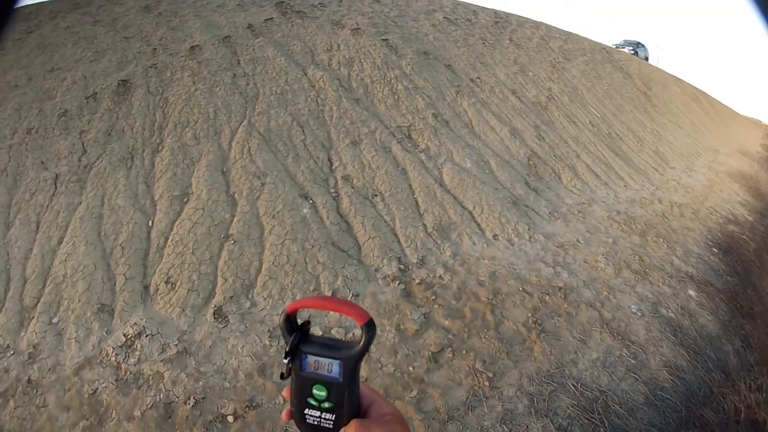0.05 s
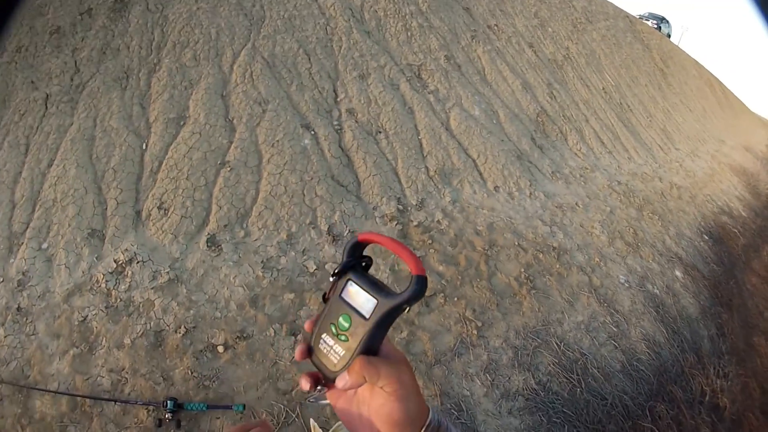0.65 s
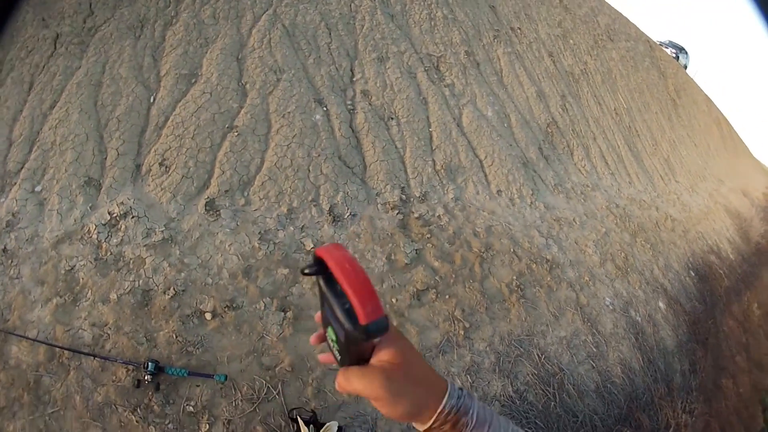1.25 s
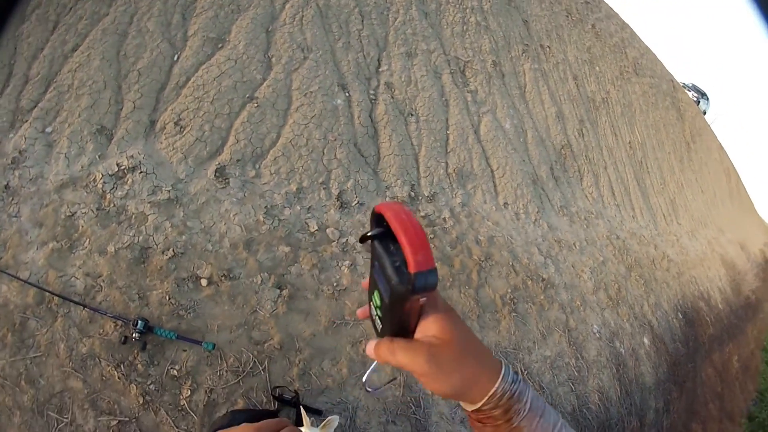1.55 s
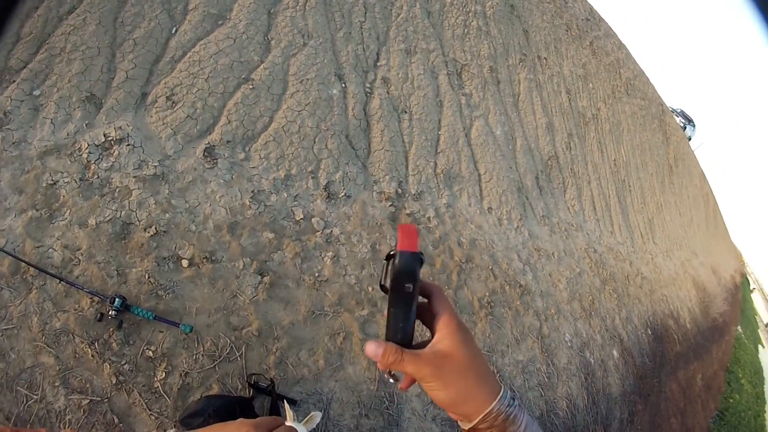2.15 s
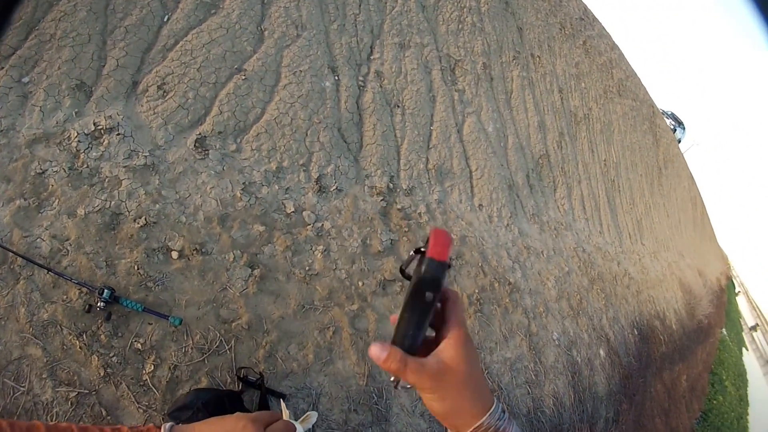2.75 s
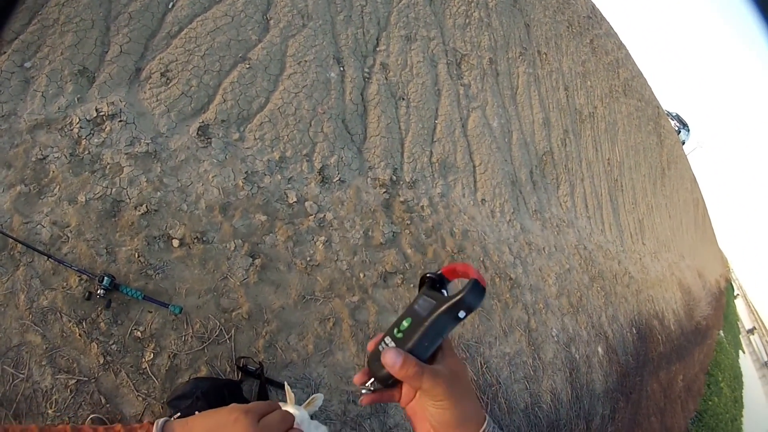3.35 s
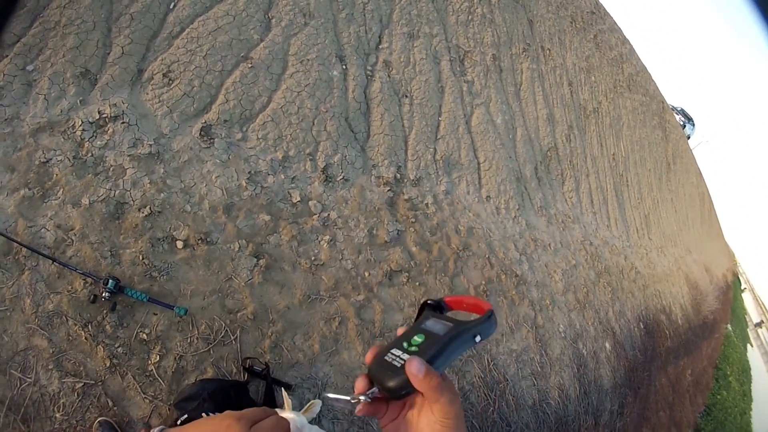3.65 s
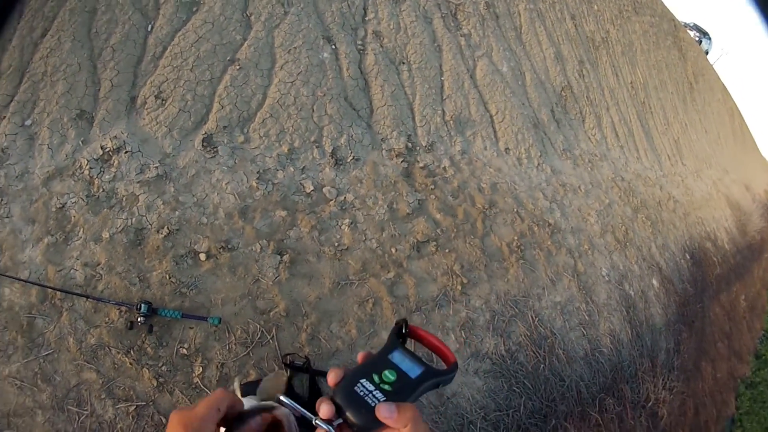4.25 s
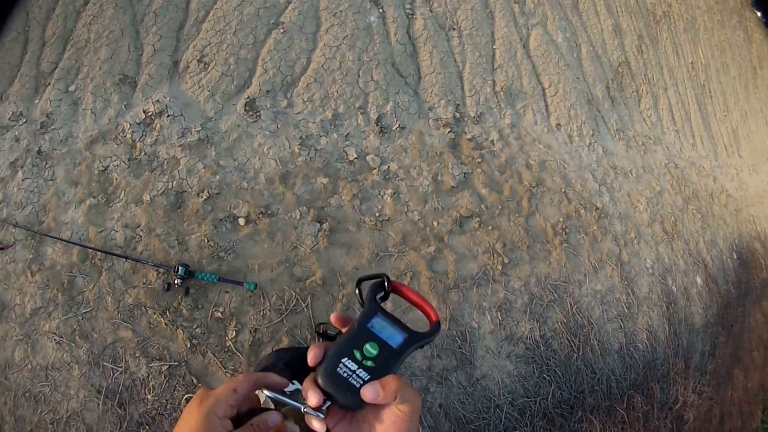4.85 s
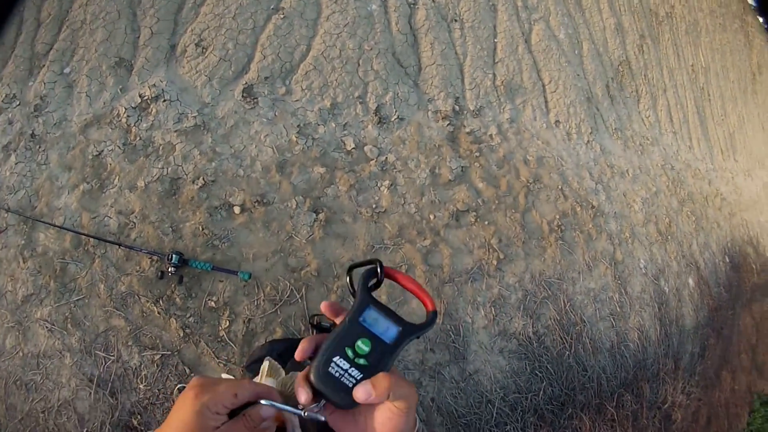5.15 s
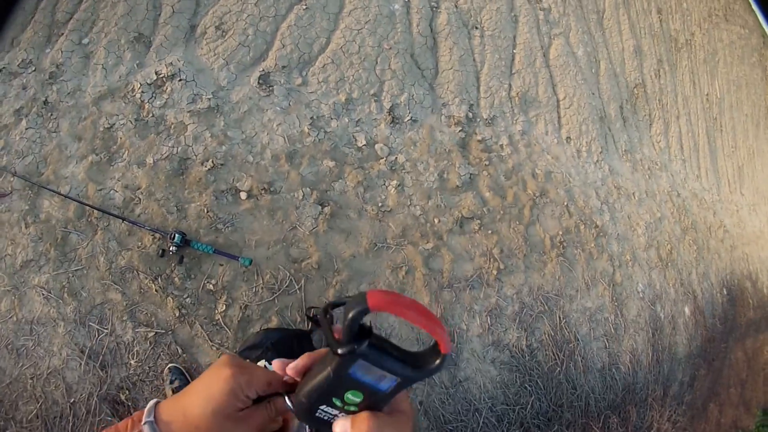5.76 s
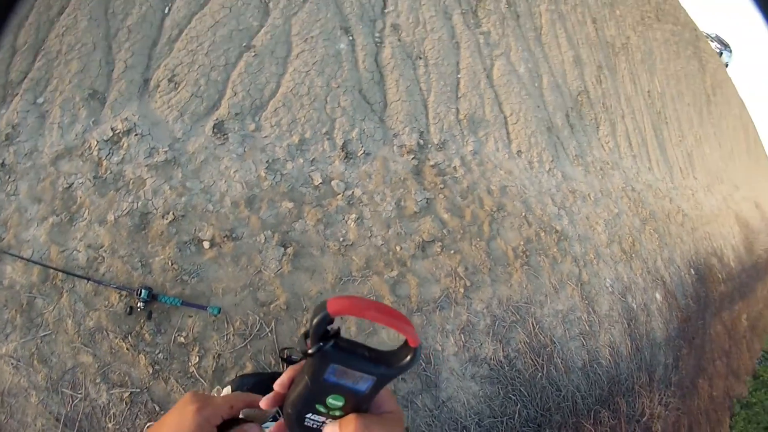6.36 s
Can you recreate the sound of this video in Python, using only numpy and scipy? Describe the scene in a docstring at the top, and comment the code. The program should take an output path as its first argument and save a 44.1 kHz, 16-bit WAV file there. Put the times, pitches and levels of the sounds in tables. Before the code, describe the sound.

A light outdoor breeze buffets a body-worn microphone with low, irregular puffs and rumble, strongest in the first second and slowly easing. At about 1.2 seconds a hanging scale is turned over in the hand: its steel clip and hook knock against the hollow plastic case in a quick flurry of small, bright clacks until 1.6, each ringing very briefly. Sparse ticks and a faint rasp of sliding steel follow. A second flurry comes from 2.8 to 3.2 seconds, then two soft fingertip taps on the case around 3.4. From 3.5 to 5 seconds the handling pauses while weaker wind puffs continue. Lighter, scattered clicks and tiny scrapes return from 5.1 to 6.1 seconds, with another dull tap near 5.9. The handling is close and quieter than the wind, both slightly to the left. A faint open-air rush and steady hiss lie underneath throughout.

```python
"""Low puffs of a light breeze buffet a body-worn microphone. After a second, small clacks join in:
a hanging scale is turned over in the hand, and its steel clip and hook swing against the hollow
plastic case. Each knock makes case, hook and clip ring briefly; in between, the steel slides and
fingers tap. Faint open-air noise and a steady hiss lie underneath."""
import sys
import numpy as np
from scipy import signal
from scipy.fft import rfft, irfft
from scipy.io import wavfile
from scipy.ndimage import uniform_filter1d

SR = 44100
rng = np.random.default_rng(int(sys.argv[2]) if len(sys.argv) > 2 else 0)


def dump_mix(stems):
    """Bounce the given channels to the path in sys.argv[1] as a 16-bit WAV at rate SR."""
    frames = np.atleast_2d(stems).T  # one column per channel
    limited = np.clip(frames, -1, 1)  # hard clip at full scale
    pcm = np.round(limited * 32767).astype(np.int16)
    wavfile.write(sys.argv[1], SR, pcm)


N = 282240

# the tones that case, hook and clip ring with: (pitch [Hz], level [dB], time to fade 60 dB if free [s])
SCALE_TONES = [(1060, -4.5, 0.034), (1266, -2, 0.055), (1367, -1.5, 0.045), (1470, 5.5, 0.017),
               (1617, 2.5, 0.021), (1840, -8, 0.049), (1957, -5.5, 0.045), (2180, -3.5, 0.029),
               (2292, -5.5, 0.042), (2420, -16.5, 0.031), (3194, -11, 0.02), (3520, -2, 0.017),
               (4075, -7, 0.023), (4710, -1, 0.015), (5140, -7, 0.024), (5500, -1, 0.014),
               (6100, -3, 0.0061), (6630, 0, 0.012), (6950, -5, 0.026), (6715, 6, 0.012),
               (7140, 0.5, 0.0061), (8160, -11, 0.0068), (11220, -12.5, 0.01)]
GRIP_SHARE = 0.72   # share of that fading time left when a hand holds the scale
# swirls of air that hit the microphone: (time [s], strength [dB], pitch [Hz], half length of gust [s])
SWIRLS = [(0.089, -36, 61, 0.021), (.142, -30, 60.5, 0.021), (.175, -36, 30, 0.017), (0.215, -38, 58, .015),
          (.245, -32.5, 35, 0.023), (0.291, -27, 48, 0.029), (.356, -38.5, 62, 0.014),
          (.759, -35, 41.2, 0.037), (.867, -34, 63, 0.017), (.886, -33.5, 52.7, 0.03),
          (0.946, -33, 46.6, 0.016), (0.971, -33, 48, 0.033), (1.088, -36, 65, 0.015),
          (1.118, -36.5, 67.6, .01), (1.183, -45, 33, 0.013), (1.346, -49.5, 35, 0.013),
          (1.42, -38, 30.2, 0.035), (1.474, -38.5, 28, 0.042), (1.686, -38, 34.5, 0.021),
          (1.975, -32.5, 27.3, 0.026), (2.116, -54, 35, .02), (2.365, -40, 41.6, .015),
          (2.44, -41.5, 38.3, 0.024), (2.623, -38, 29.2, 0.0082), (2.757, -34, 36.2, 0.022),
          (2.835, -45, 33, .025), (3.021, -35.5, 36.2, 0.051), (3.068, -42, 35.2, .013),
          (3.273, -38.5, 45.3, 0.0065), (3.417, -43.5, 26, 0.025), (3.496, -37, 42, 0.036),
          (3.78, -40.5, 28, .03), (4.038, -41.5, 54, 0.0076), (4.43, -41.5, 24.7, 0.0083),
          (4.931, -37.5, 43, 0.023), (4.981, -36.5, 31.5, 0.031), (5.052, -39.5, 34.7, 0.031),
          (5.431, -41.5, 38, 0.024), (5.525, -41, 32.7, 0.024), (5.65, -41, 28.8, 0.017)]


def clacks(scatter_db=2.0, detune=0.0082, hard_scuff_s=0.00055):
    """Steel knocks on the case and every part rings; the hardest, shortest knocks also crack."""
    # where a knock lands decides how hard each part rings:
    # (time [s], low case [dB], middle case [dB], high case [dB], hook [dB], clip [dB], scuff time [s])
    knocks = [(1.0222, -77, -83.0, -63, -73, -85.0, 0.0013),
              (1.2107, -50.5, -58, -48.5, -57.0, -59, 0.00082),
              (1.26, -55, -64, -58, -64.5, -65.5, 0.00068), (1.2695, -62, -70, -70, -64, -69, 0.0015),
              (1.279, -61, -70, -62, -64, -70, 0.0013), (1.2898, -50, -54, -60, -55, -56, 0.00068),
              (1.3069, -48.5, -58, -51.5, -52, -56.5, 0.0013),
              (1.3545, -57.5, -74, -65, -70, -61.5, 0.0015),
              (1.4455, -61.5, -70, -75.5, -73.0, -72.5, 0.0014), (1.458, -65, -72, -64, -70.5, -64, 0.0015),
              (1.522, -61, -69, -70.0, -74, -76, 0.0013), (1.5362, -64, -77, -80, -71, -71.0, 0.0013),
              (1.551, -66, -62.5, -66, -74, -63, 0.0041), (1.886, -69, -74, -66, -81.5, -68.0, 0.0014),
              (2.084, -73, -79, -67.5, -81, -74, 0.0014), (2.377, -63, -70, -61, -78.0, -75.0, 0.0019),
              (2.524, -77, -65, -63.5, -84, -85.0, 0.0013), (2.613, -66, -69, -72, -81.0, -76.0, 0.0026),
              (2.699, -68, -68, -68, -81.0, -80.0, 0.0018), (2.822, -60.5, -66, -65, -79.0, -66.0, 0.00082),
              (2.881, -50, -49, -60, -72, -69, 0.00071), (2.8929, -65, -52, -50.5, -67, -52.5, 0.00091),
              (2.943, -60, -65, -64, -81.0, -81.5, 0.002), (2.9982, -61, -61.5, -66, -72, -71, 0.0017),
              (3.0335, -53, -50.5, -54, -71, -76, 0.00098), (3.0383, -58, -61, -58, -63, -55, 0.00081),
              (3.0697, -55.5, -50.5, -68, -65, -58, 0.0007), (3.0832, -60, -57, -74, -80.0, -73, 0.0011),
              (3.222, -60.5, -65, -62, -76, -71.5, 0.0011), (3.232, -62, -57.5, -61, -75, -70.0, 0.0009),
              (5.132, -80.5, -80, -61, -73, -71, 0.00073), (5.209, -61, -62, -73, -75.5, -72, 0.0017),
              (5.243, -70, -73, -61.5, -81.5, -78.0, 0.0015), (5.354, -80, -79, -69, -69, -76, 0.0012),
              (5.515, -77, -82.5, -69.5, -81.0, -84.5, 0.0013), (5.532, -71, -70, -80, -82, -84, 0.0015),
              (5.565, -70, -66, -68, -81.0, -74, 0.0012), (5.782, -67, -70, -76, -84, -84, 0.0013),
              (5.8185, -60.5, -63.5, -67, -83, -79, 0.001), (5.857, -76.0, -66, -67, -81.5, -85.0, 0.00089),
              (6.111, -76, -76, -68, -81.0, -78.0, 0.0012), (6.124, -80, -81, -73, -84, -82, 0.0013)]
    t, out = np.arange(SR // 8) / SR, np.zeros(N + SR)
    hz, tone_db, fade_s = np.transpose(SCALE_TONES)
    for time_s, *parts_db, scuff_s in knocks:
        level_luck, pitch_luck, sign_luck = rng.standard_normal((3, len(hz)))
        strength = from_db(tone_db + scatter_db * level_luck) * np.sign(sign_luck)
        pitch = hz * (1 + detune * pitch_luck)   # the grip shifts the tones a little
        rings = ringing(t, pitch, fade_s * GRIP_SHARE, rise_cycles=1.6)
        force = knock_force(t, scuff_s)
        crack_db = parts_db[-1] - 8 - 10 * np.log2(scuff_s / hard_scuff_s)
        sound = with_level(steel_crack(t), crack_db)
        for part, db in enumerate(parts_db):
            part_ring = (strength * (part_of(hz) == part)) @ rings
            sound += with_level(signal.fftconvolve(force, part_ring)[:len(t)], db)
        start = round(time_s * SR)
        out[start:start + len(t)] += sound
    return without_bass(out[:N], low_hz=970)


def knock_force(t, scuff_s, firm_s=0.0016):
    """One blow, then tiny bounces; the longer the scuff, the more of the force is in the bounces."""
    bounces = tiny_catches(len(t), per_s=5000) * t * np.exp(-t / scuff_s)
    force = scuff_s / firm_s * bounces / (np.linalg.norm(bounces) + 1e-12)
    force[0] = 1
    return force


def steel_crack(t, fade_s=0.0027):
    """The bright crack where steel lands: it starts at once and dies within milliseconds."""
    treble = signal.butter(2, [7500, 12000], "band", fs=SR, output="sos")
    return signal.sosfilt(treble, rng.standard_normal(len(t)) * np.exp(-t / fade_s))


def sliding_steel():
    """Steel slides along the case, catching and slipping so fast that the scale's tones blur to a rasp."""
    # slides as the wrist turns:
    # (time [s], level [dB], half length [s], high case over low case [dB], steel over case [dB])
    slides = [(1.169, -64, 0.0065, -9.5, -19), (1.208, -65, 0.0044, -7, -10), (1.223, -59, 0.0089, -3, -8),
              (1.267, -61, 0.009, -14, -12), (1.342, -69, 0.0087, -10, -6), (1.47, -68, .012, -11, -15),
              (1.555, -58.5, 0.0049, -5, -18), (1.577, -63, 0.012, -2, -15), (1.866, -72, .016, 7, -10),
              (1.948, -67, .008, -2, -17), (2.25, -76, 0.32, -3, -12), (2.555, -68.5, 0.0073, 5, -10),
              (2.628, -69, .01, 1, -16), (2.85, -62.5, 0.0099, -15, -14), (2.9, -56, 0.012, -2, -14),
              (3.049, -61.5, 0.03, -3, -6.5), (3.104, -67.5, 0.015, -8, -15), (5.125, -73, 0.0063, 8, -2),
              (5.224, -70, .007, 4, -10), (5.8, -67, 0.01, -6, -15), (5.84, -66.5, 0.012, 5, -13)]
    t, out = np.arange(SR // 8) / SR, np.zeros(N)
    hz, tone_db, fade_s = np.transpose(SCALE_TONES)
    times, case_db, half_s, high_db, steel_db = np.transpose(slides)
    low_db = case_db - 10 * np.log10(1 + from_db(high_db) ** 2)   # low and high tones share the energy
    rings = ringing(t, hz, fade_s * GRIP_SHARE, rise_cycles=0.67)
    strength = from_db(tone_db) * rng.choice([-1, 1], len(hz))
    friction = tiny_catches(N, per_s=1400)
    part = part_of(hz)
    for tones, db in ((part < 2, low_db), (part == 2, low_db + high_db), (part > 2, case_db + steel_db)):
        rasp = signal.fftconvolve(friction, (strength * tones) @ rings)[:N]
        out += swells(times, db, half_s) * steadied(unit_level(rasp), seconds=0.011)
    return without_bass(out, low_hz=810)


def finger_taps(boost_db=4.5):
    """A soft fingertip wakes just one dull tone of the case."""
    # fingers landing on the case: (time [s], strength [dB], pitch [Hz])
    taps = [(3.322, -54, 1520), (3.418, -44, 1070), (5.925, -42.5, 1320)]
    t, out = np.arange(SR // 8) / SR, np.zeros(N + SR)
    for time_s, db, hz in taps:
        ring = ringing(t, hz, fade_s=0.011, rise_cycles=2.5)[0]
        start = round(time_s * SR)
        out[start:start + len(t)] += from_db(db + boost_db) * ring
    return out[:N]


def wind_puffs(trim_db=-1.0):
    """Each passing swirl of air pushes on the microphone, then sucks: one quick swing of pressure."""
    t, out = np.arange(N) / SR, np.zeros(N)
    for time_s, db, hz, _ in SWIRLS:
        past = 2 * np.sqrt(np.pi) * hz * (t - time_s)   # how far the swirl's middle has gone by
        out -= from_db(db + trim_db) * np.pi * past / (1 + past ** 2) ** 2
    return out


def breeze(typical_swirl_db=-31, typical_swirl_hz=40.4):
    """A breeze with a gust around each swirl: large swirls rumble, smaller ones flutter above them."""
    # the breeze between gusts, slowly dying down: (time [s], strength [dB])
    breeze_curve = [(0, -44.5), (.4, -48.5), (.6, -54), (.8, -50), (1.25, -49.5), (1.5, -48), (1.8, -52),
                    (2.05, -45.5), (2.24, -53), (2.5, -51), (3.15, -52.5), (3.6, -54.5), (4.5, -53),
                    (4.8, -56.5), (5.25, -57), (5.6, -53.5), (6.1, -51.5), (6.2, -63), (6.4, -57)]
    # how deep or bright the rumble and the flutter are: (frequency [Hz], level [dB])
    rumble_spectrum = [(17, 10), (27, -3), (45, -2.5), (70, -10), (100, -22.5), (160, -35.5), (300, -59),
                       (3000, -120)]
    flutter_spectrum = [(50, -9.5), (100, 1), (150, -4.5), (220, -10.5), (350, -20), (700, -33),
                        (1500, -45), (6000, -110)]
    breeze_db = np.interp(np.arange(N) / SR, *np.transpose(breeze_curve))
    times, swirl_db, hz, half_s = np.transpose(SWIRLS)
    # strong, small (higher-pitched) swirls flutter most
    gust_flutter_db = -58.5 + 1.16 * (swirl_db - typical_swirl_db) + 15.5 * np.log2(hz / typical_swirl_hz)
    breeze_flutter_db = -64.5 + 0.34 * (breeze_db - breeze_db.mean())
    rumble_gain = np.hypot(from_db(breeze_db + 2.5), swells(times, swirl_db - 8.5, half_s))
    flutter_gain = np.hypot(from_db(breeze_flutter_db), swells(times, gust_flutter_db, half_s))
    rumble = steadied(shaped_noise(rumble_spectrum), seconds=0.063)
    flutter = steadied(shaped_noise(flutter_spectrum), seconds=0.061)
    return rumble_gain * rumble + flutter_gain * flutter


def open_air(level_db=-65.5):
    """The faint, even rush of the outdoors."""
    # strongest in the bass: (frequency [Hz], level [dB])
    air_spectrum = [(40, -2), (120, -2.5), (230, -0.5), (400, -3.5), (700, -7.5), (1300, -10.5),
                    (2500, -14.5), (5000, -19.5), (9000, -23), (15000, -28)]
    return from_db(level_db) * shaped_noise(air_spectrum)


def hiss(level_db=-75):
    """A steady hiss, separate for left and right."""
    # nearly even from low to high: (frequency [Hz], level [dB])
    hiss_spectrum = [(100, 0), (300, 1), (700, 1.5), (2000, 4), (5000, 4), (9000, 2.5), (12000, 3.5),
                     (15000, -4)]
    return from_db(level_db) * np.array([shaped_noise(hiss_spectrum), shaped_noise(hiss_spectrum)])


def ringing(t, hz, fade_s, rise_cycles):
    """Tones, one a row, that build up over a few cycles and fall by 60 dB in fade_s."""
    cycles = np.outer(hz, t)
    rise = 1 - np.exp(-cycles / rise_cycles)
    fade = np.exp(-np.log(1000) * np.outer(1 / fade_s, t))
    return np.sin(2 * np.pi * cycles) * rise * fade


def part_of(hz):
    """Which part owns each tone: 0-2 low, middle and high case, 3 hook, 4 clip."""
    # borders between one part's tones and the next: (frequency [Hz])
    borders = [1540, 2080, 3350, 5900]
    return np.searchsorted(borders, hz)


def tiny_catches(size, per_s):
    """Random little clicks of one surface catching on another."""
    return (rng.random(size) < per_s / SR) * rng.standard_normal(size)


def without_bass(x, low_hz):
    """A small case gives off no bass."""
    return signal.sosfilt(signal.butter(6, low_hz, "high", fs=SR, output="sos"), x)


def swells(times, levels_db, half_lengths):
    """A loudness curve of smooth, bell-shaped bumps; where they overlap, their power adds up."""
    t, power = np.arange(N) / SR, np.zeros(N)
    for time_s, db, half_s in zip(times, levels_db, half_lengths):
        bell = np.exp(-np.minimum(((t - time_s) / half_s) ** 2, 20))
        power += from_db(db) ** 2 * bell
    return np.sqrt(power)


def shaped_noise(spectrum):
    """Noise at level 1 with the given mix of lows and highs, fading out below hearing."""
    hz = np.arange(N // 2 + 1) * SR / N + 1e-3
    points_hz, level_db = np.transpose(spectrum)
    gain = from_db(np.interp(np.log(hz), np.log(points_hz), level_db))
    low_cut = 1 / np.sqrt(1 + (15 / hz) ** 8)
    return unit_level(irfft(rfft(rng.standard_normal(N)) * gain * low_cut, N))


def steadied(x, seconds):
    """Even out chance swells that last longer than the given time."""
    size = int(seconds * SR)
    power = uniform_filter1d(uniform_filter1d(x ** 2, size), size)
    return x / np.sqrt(np.abs(power) + 1e-6)


def with_level(x, db, knock_s=0.005):
    """Give a short sound the energy of the given level held for the length of a knock."""
    return from_db(db) * np.sqrt(knock_s * SR) * x / (np.linalg.norm(x) + 1e-12)


def unit_level(x):
    """Bring a sound's average (rms) level to 1."""
    return x / np.sqrt(np.mean(x ** 2) + 1e-20)


def from_db(db):
    """Turn decibels into a number to multiply by."""
    return 10 ** (np.asarray(db) / 20)


def scene(left_lead_db=4.5):
    """All outdoor sound is louder on the left; the hiss is equally loud on both sides."""
    outdoors = clacks() + sliding_steel() + finger_taps() + wind_puffs() + breeze() + open_air()
    sides = from_db(left_lead_db * np.array([[.5], [-.5]]))
    return outdoors * sides / sides.mean() + hiss()


def record(dry, cutoff_hz=15250):
    """The very highest treble is cut off steeply."""
    return signal.sosfilt(signal.ellip(12, .1, 70, cutoff_hz, fs=SR, output="sos"), dry)


dry = scene()
out = record(dry)
dump_mix(out)
```